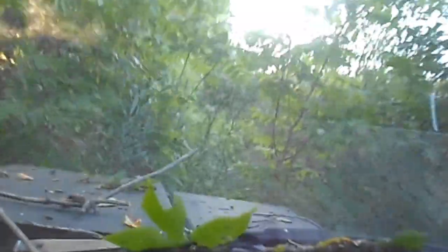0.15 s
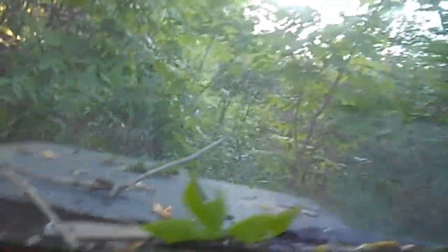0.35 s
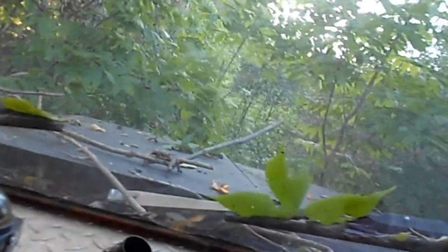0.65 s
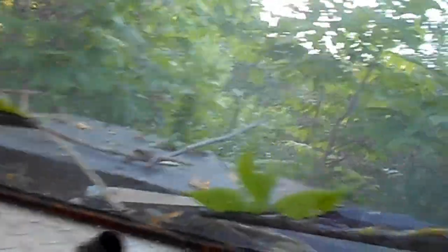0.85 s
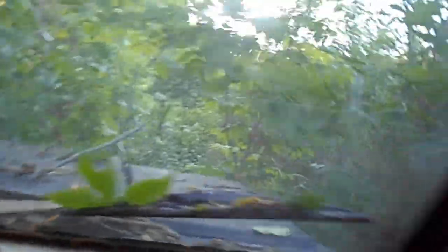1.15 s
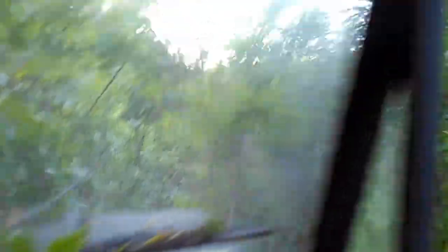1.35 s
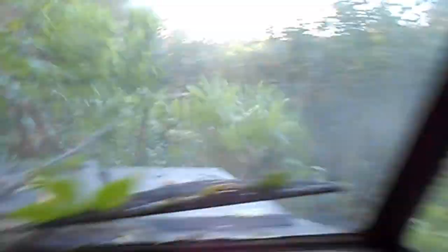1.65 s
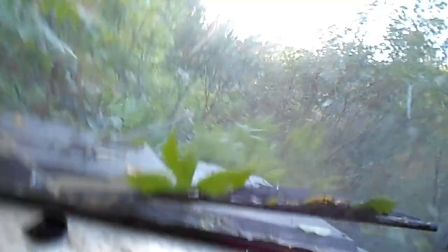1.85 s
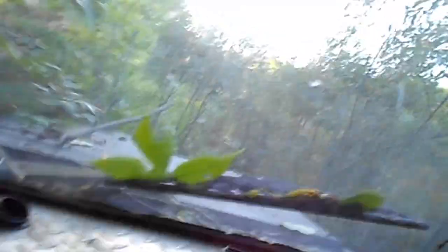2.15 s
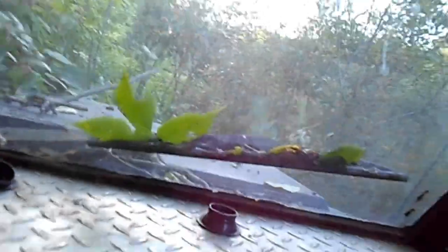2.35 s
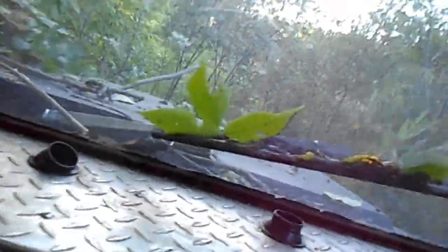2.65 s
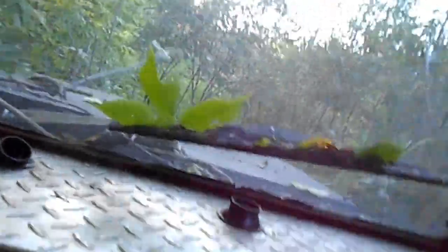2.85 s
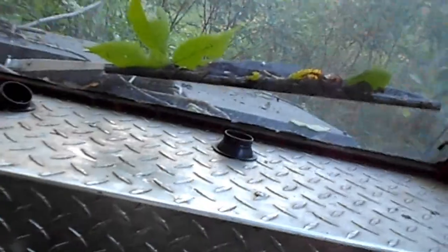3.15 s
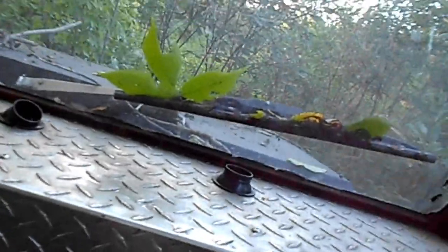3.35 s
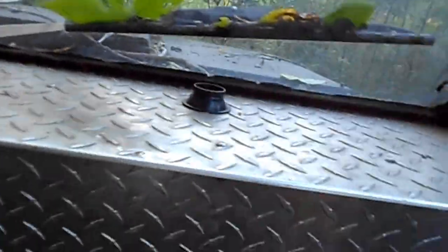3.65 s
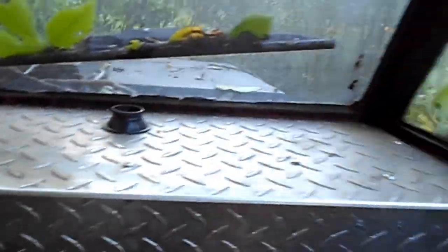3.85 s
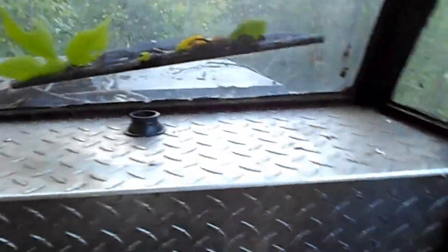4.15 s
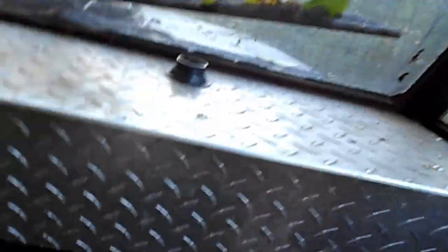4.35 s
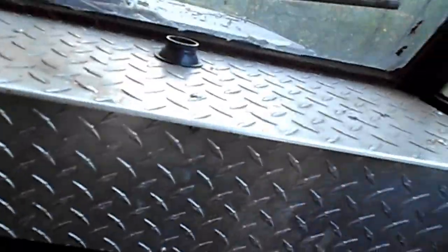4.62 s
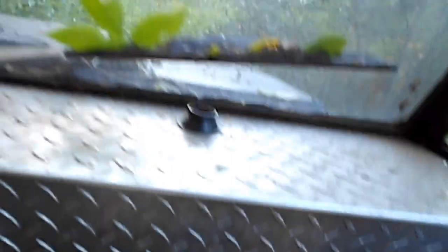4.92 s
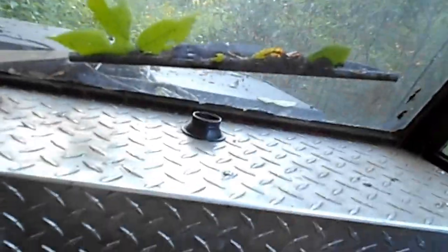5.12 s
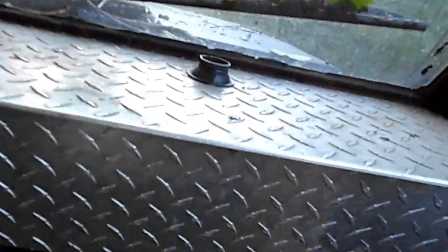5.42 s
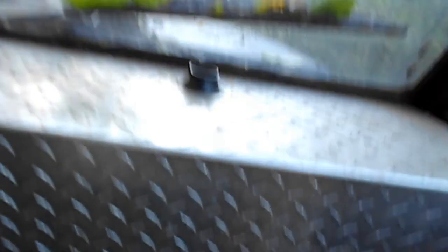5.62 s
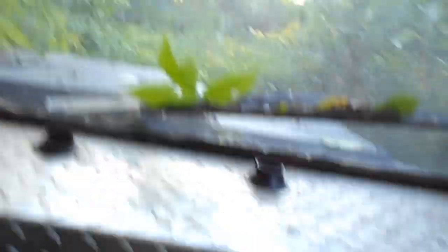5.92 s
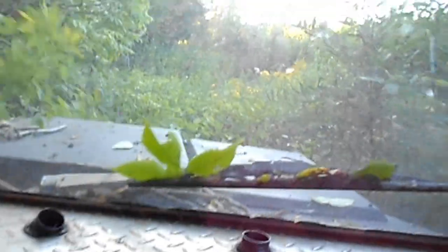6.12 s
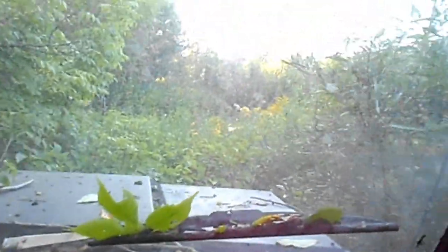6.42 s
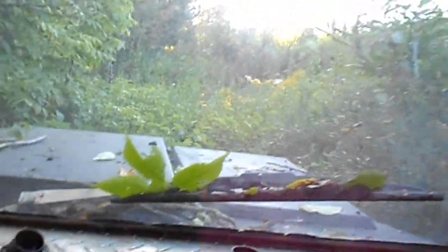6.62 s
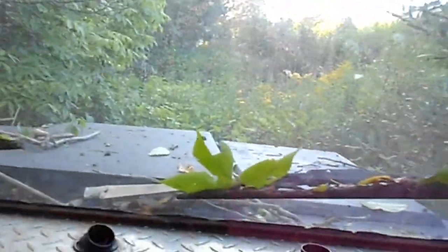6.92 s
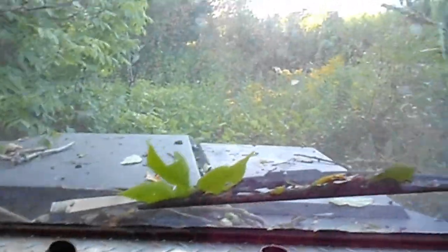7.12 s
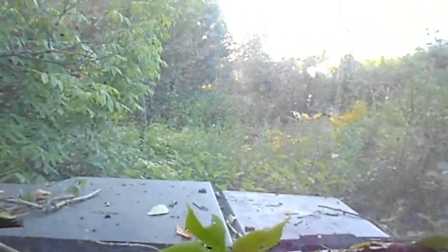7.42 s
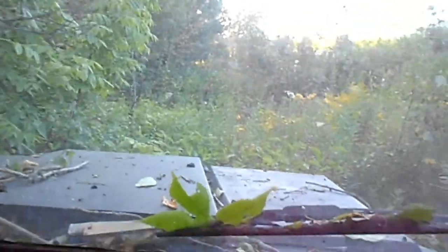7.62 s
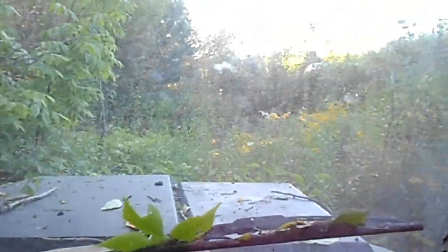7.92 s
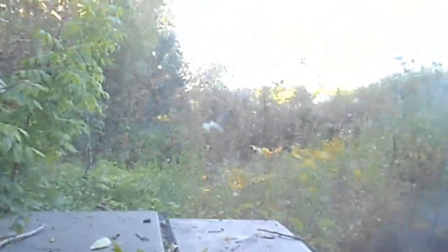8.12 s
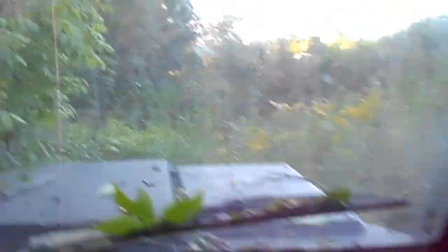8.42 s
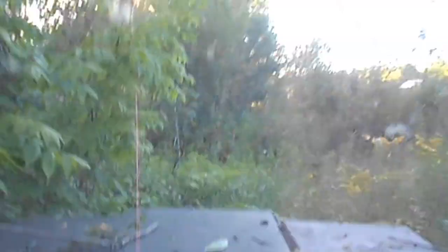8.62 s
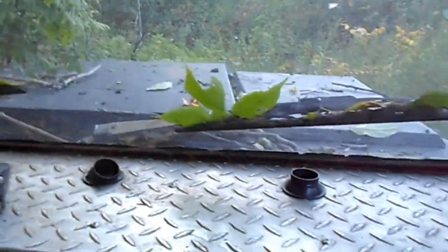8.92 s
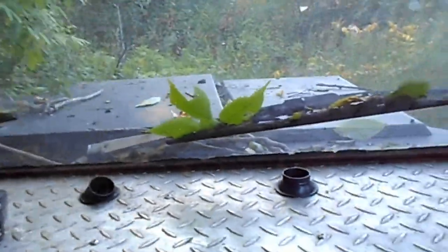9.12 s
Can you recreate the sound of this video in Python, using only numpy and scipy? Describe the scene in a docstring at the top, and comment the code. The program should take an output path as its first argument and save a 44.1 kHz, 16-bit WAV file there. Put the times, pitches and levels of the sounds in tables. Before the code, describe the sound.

A loud, bassy engine drone fills a metal cab from start to end, with faint brush hiss and ringing sheet metal. Grainy branch scrapes, hard little ticks and brief hoarse squeaks come irregularly. Deep thumps hit the floor after two seconds as the engine slows and the chassis shudders. Later it steadies, contact noises thin out, dry clicks fall, and the revs jump before one last faint bump. Recorded by a small microphone in the cab.

```python
"""A truck with a slow eight-cylinder engine pushes through brush on a rough trail, heard inside the steel cab.
From the start the firing rate booms in the cab, made of near sines that throb once per engine cycle, over a
roar of coloured noise from engine block and trail. Branches scrape (grainy noise), twigs tick (noise and
short rings), and panels squeak (wavering tones and noise). After two seconds a low shake (two tones) and
bumps (fading sines) thump the floor and the first dry clicks (bare impulses) fall; one more bump comes late."""
import sys
import numpy as np
from scipy import signal
from scipy.io import wavfile

SR = 44100
rng = np.random.default_rng(int(sys.argv[2]) if len(sys.argv) > 2 else 0)


def convert_level_to_amplitude(level_db):
    """Map a level in decibels to its linear amplitude factor."""
    exponent = np.asarray(level_db, float) / 20
    return 10 ** exponent


def generate_wav(sig):
    """Save sig (samples, or channels by samples) to the path in sys.argv[1] as 16-bit PCM at SR."""
    pcm = np.round(np.clip(np.atleast_2d(sig).T, -1, 1) * 32767).astype(np.int16)
    wavfile.write(sys.argv[1], SR, pcm)


N = 408807
TOP_HZ = 10700  # upper edge of the sound


def rms_one(x):
    """Scale to rms 1."""
    return x / np.sqrt(np.mean(x ** 2) + 1e-20)


def in_time(rows):
    """Turn table columns into curves over all samples; the first column is the time in seconds."""
    seconds, *columns = np.transpose(rows)
    return [np.interp(np.arange(N) / SR, seconds, column) for column in columns]


def at_hz(points, hz):
    """Read a table of (Hz, dB) between its points, on a log-frequency axis."""
    table_hz, table_db = np.array(points).T
    return np.interp(np.log(hz), np.log(table_hz), table_db)


def drift(rate, size=N):
    """Slow random curve through points of spread 1, turning about rate times a second (190 at most)."""
    knots = rng.standard_normal(int(N / SR * 400) + 4)
    return np.interp(np.arange(size) * 2 * min(rate, 190) / SR, np.arange(len(knots)), knots)


def band(x, low_hz, high_hz):
    """Keep the sound between two frequencies."""
    return signal.sosfilt(signal.butter(2, [low_hz, high_hz], "band", fs=SR, output="sos"), x)


def resonance(x, hz, width):
    """Ring at one frequency: a two-pole filter with gain near 1 at its top, wider meaning a shorter ring."""
    r = np.exp(-np.pi * width / SR)
    return signal.lfilter([1 - r, 0, r - 1], [1, -2 * r * np.cos(2 * np.pi * hz / SR), r * r], x)


def rung(x, modes):
    """Pass the sound through resonances side by side, with alternating sign."""
    out = 0
    for k, (hz, width, db) in enumerate(modes):
        out = out + (-1) ** k * convert_level_to_amplitude(db) * resonance(x, hz, width)
    return out


def coloured(spectrum, patchy_db, ref_low, ref_high):
    """Half-octave noise bands that flicker partly together; rms 1 between the two reference edges."""
    out = 0
    together = drift(9.0)
    edges = 15 * 2 ** np.arange(0, 9.8, .5)  # Hz
    white = rng.standard_normal((2, N))
    for k, (low, high) in enumerate(zip(edges, edges[1:])):
        flicker_db = patchy_db * (together + 2.06 * drift(18.0))
        level_db = at_hz(spectrum, np.sqrt(low * high)) + flicker_db
        out = out + convert_level_to_amplitude(level_db) * band(white[k % 2], low, high)
    return out / np.std(band(out, ref_low, ref_high))


# Engine speed. Each row: time in seconds, firings per second.
SPEED = [(0, 53), (.52, 51), (.8, 57), (1.11, 58.7), (1.5, 59.6), (1.8, 59), (2.1, 60.5), (2.25, 50.6),
         (2.5, 44.2), (3.17, 43.9), (3.5, 42.5), (4.33, 43.9), (4.7, 47.9), (7.1, 48.4), (7.37, 46.7),
         (7.46, 48.5), (7.66, 63.5), (7.87, 63.7), (8.1, 66), (8.55, 61.7), (8.85, 67), (9.11, 50),
         (9.27, 43.6)]
# How each cylinder's push departs from the mean, in firing order, before scaling to the speed.
# Each row: share by which it is stronger, share by which it is earlier.
CYLINDERS = [(0.58, 0.51), (0.8, 0.55), (0.48, 0.13), (-0.18, -0.35), (-0.64, -1.2), (-1.0, -1.23),
             (-0.41, 0.56), (0.38, 1.03)]
# What the cab makes of each speed; it resonates near 50 Hz. Each row: firing rate in Hz, boom level in dB,
# unevenness of the cylinders in dB relative to the boom, second harmonic in dB relative to the boom.
CAB_BOOM = [(43.2, -12.5, -16, -38), (45, -11.5, -25.5, -36), (47.8, -11, -26.5, -25),
            (52.6, -12, -29, -22.5), (55.7, -10.5, -22, -21.5), (59, -13.5, -15.5, -19.5),
            (60, -14, -7.5, -18.5), (66, -13, -10, -21.5)]
# The driver lifts off the throttle. Each row: start in seconds, length in seconds, change of the boom in dB.
LIFT_OFFS = [(2.126, 0.27, -9.5), (2.419, 0.084, -14.5), (2.561, .18, -11.5), (2.49, 0.12, -3.5),
             (2.884, 0.47, -3), (8.91, 0.13, -3), (8.92, 0.45, -5)]
# Lesser multiples of the engine cycle as the cab passes them. Each row: frequency in Hz, level in dB.
LESSER_ORDERS = [(15, -59), (30, -47.5), (60, -37), (80, -41.5), (90, -60), (110, -48), (150, -50),
                 (190, -63.5), (260, -61)]


def engine(waver_db=0.82, lesser_waver_db=2.5, uneven_waver_db=1.5):
    """Near sines on the firing rate, bent by the eight unequal cylinders, plus other multiples of the cycle."""
    pedal_s, second_unevenness = 0.09, 2.3  # the second harmonic feels the unequal cylinders more
    per_s, = in_time(SPEED)
    hz, *laws = np.transpose(CAB_BOOM)
    boom_db, uneven_db, second_db = (np.interp(per_s, hz, law) for law in laws)
    t = np.arange(N) / SR
    for s, length, change_db in LIFT_OFFS:
        inside = np.minimum(t - s, s + length - t)  # seconds to the nearer end
        boom_db = boom_db + change_db * np.clip(inside / pedal_s + .5, 0, 1)
    uneven_db = uneven_db + uneven_waver_db * drift(2.5)

    # eight firings make one cycle, drawn as 512 smooth points
    firings = np.cumsum(per_s) / SR
    stronger, earlier = np.transpose(CYLINDERS)
    smooth = signal.resample(stronger + 1j * earlier, 512)
    uneven = convert_level_to_amplitude(uneven_db) * np.interp(firings * 64, np.arange(512), smooth, period=512)

    # complex tones: the real part of uneven bends the level, the imaginary part the timing
    turn = np.exp(2j * np.pi * firings)
    boom = (1 + uneven) * turn * convert_level_to_amplitude(waver_db * drift(12.0))
    second = (1 + second_unevenness * uneven) * turn ** 2
    second = convert_level_to_amplitude(second_db) * second * convert_level_to_amplitude(2 * waver_db * drift(15.0))
    out = np.sqrt(2) * convert_level_to_amplitude(boom_db) * (boom + second).real
    for order in [3, 5, 10, 11, 12, 13, 14, *range(18, 32)]:  # multiples of the cycle
        level_db = at_hz(LESSER_ORDERS, per_s * order / 8)
        level_db = level_db + lesser_waver_db * drift(1.5) + rng.normal(0, 2.0)
        out += np.sqrt(2) * convert_level_to_amplitude(level_db) * np.sin(2 * np.pi * (firings * order / 8 + rng.random()))
    return out


# Levels of the roar. Each row: time in seconds, rumble at 170-400 Hz in dB, body at 400-1500 Hz in dB,
# brush hiss above 2500 Hz in dB.
ROAR = [(0.0, -34.5, -48, -61.5), (0.1, -41.5, -48, -61), (0.82, -48, -50, -64), (1.23, -43, -50, -63),
        (1.43, -36.5, -47, -58.5), (1.77, -43, -46, -59), (2.17, -36.5, -40, -54.5),
        (2.51, -45.5, -49, -64), (2.87, -42, -46.5, -59), (3.28, -48, -47, -60.5),
        (3.64, -45, -44.5, -53.5), (3.92, -40, -46, -57.5), (4.15, -34, -42.5, -53.5),
        (4.66, -43.5, -46.5, -57.5), (4.92, -46.5, -45, -62), (5.41, -43, -47.5, -59),
        (5.74, -48, -49.5, -61.5), (6.18, -46, -46.5, -58), (7.02, -47, -49, -63.5),
        (7.28, -44, -45.5, -63.5), (7.58, -44.5, -53.5, -65), (7.94, -46.5, -51, -67),
        (8.81, -39, -46.5, -62), (9.2, -46.5, -45.5, -60.5)]
# Spectra of rumble, body and hiss before levelling. Each row: frequency in Hz, level in dB per Hz.
RUMBLE_COLOUR = [(15, -1.5), (32, 1), (50, 21), (75, 10), (140, 7.5), (200, 3.5), (300, -6.5), (450, -20.5),
                 (900, -50)]
BODY_COLOUR = [(150, -16), (350, 3.5), (600, 0.5), (1000, -2.5), (1300, -1), (2400, -17.5), (4000, -37.5),
               (11000, -52.5)]
HISS_COLOUR = [(800, -8.5), (2000, -2), (4200, 2), (6000, -5.5), (9000, -7), (11000, -24.5)]
# Sheet-metal resonances in the roar. Each row: frequency in Hz, width in Hz, level in dB before cab_share.
CAB = [(554, 7.2, 0.5), (599.5, 9.8, 10), (796, 200, -6.5), (916, 6.3, -1.5), (980, 6, -12),
       (1130, 4.5, -2.5), (1247, 14, -3.5), (1390, 8.3, -8.5), (2140, 54, -10), (2650, 130, -5)]


def roar(gate=.22, cab_share=1.4, knock_db=1.5):
    """Rumble, ringing body and brush hiss pulse a little with every firing; in the body some knock harder."""
    rumble_db, body_db, hiss_db = in_time(ROAR)
    firings = np.cumsum(in_time(SPEED)[0]) / SR
    pulse = 1 + gate * np.cos(2 * np.pi * firings)
    knocks = rng.standard_normal(int(firings[-1]) + 2)
    body_db = body_db + knock_db * np.interp(firings, np.arange(len(knocks)), knocks)
    rumble = coloured(RUMBLE_COLOUR, patchy_db=1.0, ref_low=170, ref_high=400)
    body = coloured(BODY_COLOUR, patchy_db=1.3, ref_low=400, ref_high=1500)
    body = body + cab_share * rung(body, CAB)
    body = body / np.std(band(body, 400, 1500))
    hiss = coloured(HISS_COLOUR, patchy_db=1.2, ref_low=2500, ref_high=10000)
    return pulse * (convert_level_to_amplitude(rumble_db) * rumble + convert_level_to_amplitude(body_db) * body + convert_level_to_amplitude(hiss_db) * hiss)


# Panel resonances. Each row: frequency in Hz, width in Hz, level in dB before ring_share.
PANEL = [(575, 15, -7), (784, 42, -0.5), (1116, 14, -2), (1417, 41, 3), (1985, 22, -3.5), (2205, 29, 0),
         (3310, 26, -9.5), (4240, 340, 2.5), (4860, 39, -0.5), (5170, 120, 0), (6300, 23, -5.5)]


def contacts(events, shape, grain_db, ring_share=2.5, dull_hz=700):
    """Grainy noise under each contact's envelope, in three overlapping registers that ring the panels."""
    lows_db, highs_db = -2.5, -7.5  # outer registers of a contact of middling brightness, relative to its middle
    envelopes = np.zeros((3, N))
    for s, db, bright_db, length in events:
        at = round(s * SR)
        t = np.arange(min(int(8 * length * SR), N - at)) / SR
        lasts = length * np.array([[1.15], [1], [.8]])  # the highs die first
        levels_db = [[db + lows_db - bright_db], [db], [db + highs_db + bright_db]]
        envelopes[:, at:at + len(t)] += convert_level_to_amplitude(levels_db) * shape(t, lasts)
    grains = rng.standard_normal(N) * convert_level_to_amplitude(grain_db * drift(70.0))
    dull = signal.sosfilt(signal.butter(1, dull_hz, fs=SR, output="sos"), grains)
    out = 0
    for (low_hz, high_hz), envelope in zip([(230, 1200), (1100, 2800), (2900, 9200)], envelopes):
        struck = rms_one(band(dull, low_hz, high_hz)) * envelope + 1e-18
        ringing = struck + ring_share * rung(struck, PANEL)  # the panels ring on
        out = out + band(ringing, low_hz / 1.3, high_hz * 1.2)
    return out


# Branches drag along the panels. Each row: start in seconds, level in dB before the common trim,
# brightness in dB, length in seconds of the middle register.
SCRAPES = [(0, -35.5, -8, 0.033), (.424, -35, 1.5, 0.022), (.438, -43.5, -3, 0.044),
           (.9235, -43, 8.5, 0.048), (1.2, -39, -11, 0.065), (1.509, -45.5, 8.5, 0.043),
           (1.813, -38, 0.5, 0.054), (1.874, -42, -0.5, 0.05), (2.109, -37, 0, 0.059),
           (2.19, -44.5, -15, 0.044), (2.216, -34, -4.5, 0.021), (2.238, -29, -2, 0.027),
           (2.268, -35, -13.5, 0.049), (2.311, -29.5, -2, 0.017), (2.326, -38.5, -4, 0.078),
           (2.721, -36.5, -6, 0.044), (2.768, -36, -7.5, 0.088), (2.85, -43.5, 2.5, 0.085),
           (3.39, -40, -3, 0.059), (3.623, -48, -12.5, 0.06), (3.91, -36, -4, 0.21),
           (4.1594, -48, 12, 0.084), (4.2065, -26.5, -3, 0.019), (4.22, -26, -6.5, 0.039),
           (4.257, -40, -6, 0.025), (4.285, -46, -7, 0.026), (4.341, -26, 0.5, 0.036),
           (4.676, -37.5, -1.5, 0.069), (4.7354, -42, -6, 0.029), (4.9714, -37, -0.5, 0.059),
           (5.073, -34.5, -4, 0.059), (5.255, -32, -1, 0.11), (5.587, -40.5, -1.5, 0.061),
           (5.879, -44.5, 8, .03), (6.062, -34, 12, 0.028), (6.092, -33, 1, 0.029), (6.118, -38.5, 1, 0.12),
           (6.262, -53, 12, 0.027), (6.345, -52, 12, 0.012), (6.493, -38, -0.5, 0.04),
           (6.536, -43, 4, 0.039), (6.761, -39, -4.5, 0.074), (6.975, -49, 9.5, 0.025),
           (7.04, -47, 7, 0.068), (7.229, -36, 7, 0.048), (7.236, -35.5, 0, 0.11),
           (7.29, -40.5, 2.5, 0.052), (2.862, -46, 8.5, 0.023), (5.17, -47.5, 5.5, .03),
           (7.4, -47, 3.5, .04), (8.775, -38, -15.5, 0.053), (9.133, -45.5, 1, 0.1)]


def scrapes():
    """A dragging branch makes noise that rises fast, then fades as a bell curve with a thin tail."""
    def shape(t, length):
        fade = .85 * np.exp(-(t / length) ** 2) + .15 * np.exp(-t / (2 * length))
        return (1 - np.exp(-t / .003)) * fade
    return convert_level_to_amplitude(-9) * contacts(SCRAPES, shape, grain_db=3.0)


# Twigs and loose parts tick. Each row: start in seconds, level in dB (before the trim in ticks()),
# brightness in dB, decay in seconds of the middle register.
TICKS = [(.1396, -37.5, -3, .013), (.629, -48, 1.5, 0.011), (.927, -41, 4, .008), (.9662, -34, -3, 0.01),
         (.983, -33.5, 6, 0.012), (1.0774, -39.5, -7, 0.014), (1.092, -31, 3.5, 0.0086),
         (1.2146, -35, 13.5, 0.01), (1.931, -32.5, 3, 0.034), (2.301, -41, 11, 0.0055),
         (2.312, -36, 0, 0.008), (2.321, -33.5, 2, 0.0049), (2.697, -46, -15, 0.019),
         (4.3465, -24, 3, 0.014), (5.532, -40, -4.5, 0.021), (5.5698, -39.5, 3, 0.021),
         (6.01, -40, 0.5, 0.013), (6.068, -43, 8.5, .008), (6.783, -38, -4, 0.011), (7.232, -37, 5, .01),
         (7.472, -39.5, -8, 0.015), (4.209, -30, -1, .01), (5.256, -38, 8.5, .012),
         (8.4871, -41.5, -13.5, 0.0098), (8.8, -44, -11, .015)]


def small_ticks(per_s=1.4, middle_db=-50.5, decay_s=0.012):
    """Faint ticks at chance moments, as rows like those of TICKS."""
    rows = []
    for when, size, bright in rng.random((int(per_s * N / SR), 3)):
        rows.append((N / SR * when, middle_db + 8.0 * (size - .5), 7.3 * (bright - .5), decay_s))
    return rows


def ticks():
    """A tick is a burst of noise that fades at two speeds and lightly rings the panels."""
    def shape(t, decay):
        return .6 * np.exp(-t / decay) + .3 * np.exp(-t / .0015)
    return convert_level_to_amplitude(-7.0) * contacts(TICKS + small_ticks(), shape, grain_db=2.0, ring_share=.9)


# What a tick snaps with. Each row: frequency in Hz, level in dB relative to the tick,
# time to fade by 60 dB in seconds, share of the brightness added to the level.
SNAP = [(1200, -11, .02, -.5), (2200, -2, .035, 0), (5300, -8, .018, 1)]


def snaps():
    """Each listed tick starts with a hard snap: a few short fading sines, pitched differently every time."""
    out = np.zeros(N + SR)
    t = np.arange(SR // 20) / SR
    for s, db, bright_db, _ in TICKS:
        at = round(s * SR)
        for hz, mode_db, t60, share in SNAP:
            pitch_hz = hz * (1 + .04 * rng.standard_normal())
            level_db = db + mode_db + share * bright_db - 60 * t / t60
            out[at:at + len(t)] += convert_level_to_amplitude(level_db) * np.sin(2 * np.pi * pitch_hz * t)
    return out[:N]


# Stick-slip squeaks and hoarse groans of the panels. Each row: start in seconds, length in seconds,
# pitch in Hz, level in dB, roughness from 0 to 1, share of the length at which it is loudest.
SQUEAKS = [(.435, .04, 820, -41, 1, .3), (.44, .05, 1300, -44, 1, .4), (1.2, .07, 600, -39, 1, .4),
           (.925, .05, 2330, -48, .8, .5), (2.13, .13, 152, -32, .6, .5), (2.33, .22, 148, -36, .5, .15),
           (2.72, .13, 152, -29, .4, .6), (2.87, .1, 150, -36, .6, .5), (2.236, .014, 1230, -38, .9, .4),
           (2.262, .04, 1200, -37, .9, .4), (3.92, .05, 1120, -41, .9, .5), (3.972, .04, 1250, -35, 1, .4),
           (4.044, .05, 2080, -32, .3, .72), (4.095, .03, 2100, -43, .45, .2),
           (4.125, .045, 1750, -47, .8, .4), (4.348, .045, 1400, -36, 1, .2),
           (4.67, .06, 1380, -40, .75, .5), (4.985, .09, 1420, -41, .8, .15),
           (5.085, .05, 1050, -40, 1, .4), (5.28, .06, 1100, -39, 1, .4), (5.82, .04, 1960, -53, .8, .5),
           (5.868, .035, 1185, -42, .8, .6), (5.845, .16, 1190, -46.5, .65, .3),
           (6.008, .04, 1215, -46, .8, .2), (6.116, .07, 1330, -36.5, 1, .3), (6.14, .06, 1800, -43, 1, .5),
           (6.378, .035, 1100, -40, .7, .4)]
# Overtones of a squeak. Each row: multiple of the pitch, level in dB before roughness weakens it.
SQUEAK_OVERTONES = [(2.02, 0), (3.03, -12), (3.91, -11), (4.86, -9)]


def squeaks():
    """A slipping contact sings a wavering pitch with overtones; rough ones turn into noise around it."""
    out = np.zeros(N)
    for s, length, hz, db, rough, crest in SQUEAKS:
        at, size = round(s * SR), int(length * SR)
        swell = np.interp(np.arange(size) / size, [0, .1, crest, .9, 1], [0, .35, 1, .55, 0])
        phase = 2 * np.pi * np.cumsum(hz * (1 + .02 * drift(150.0, size=size))) / SR
        width = hz * (.03 + .3 * rough ** 4)
        hoarse = resonance(rng.standard_normal(size), hz, width)
        hoarse = rms_one(resonance(hoarse, hz, width))
        first = np.sqrt(2 * (1 - rough)) * np.sin(phase) + np.sqrt(rough) * hoarse
        over = np.zeros(size)
        for multiple, over_db in SQUEAK_OVERTONES:
            if multiple * hz < TOP_HZ:
                over += convert_level_to_amplitude(over_db + 3.0 * drift(150.0, size=size)) * np.sin(multiple * phase)
        over *= convert_level_to_amplitude(-33 * rough)  # clean squeaks carry the stronger overtones
        voice = swell * first + np.sqrt(swell) * np.hanning(size) * over
        out[at:at + size] += convert_level_to_amplitude(db + 2.2 * drift(90.0, size=size)) * voice
    return out


# A low shake of the chassis while the truck labours over an obstacle. Each row: time in seconds,
# frequency in Hz, level in dB, level of the upper hum in dB.
SHAKE = [(2.15, 27, -61, -50), (2.3, 27.86, -24, -36), (2.6, 28.6, -33.5, -32), (2.9, 29.14, -21, -32),
         (3.4, 29.22, -38, -35.5), (3.9, 29.1, -39, -38), (4.1, 28, -57, -50)]


def shake():
    """The chassis shakes as a low sine with a wavering hum above it."""
    hz, db, upper_db = in_time(SHAKE)
    phase = 2 * np.pi * np.cumsum(hz) / SR
    low = convert_level_to_amplitude(db) * np.sin(phase)
    upper = convert_level_to_amplitude(upper_db + 2.0 * drift(10.0)) * np.sin(2.52 * phase)
    return np.sqrt(2) * (low + upper)


# Bumps in the trail. Each row: start in seconds, level in dB before swell and fade, boom frequency in Hz,
# swell in seconds, time for the boom to fade by 60 dB in seconds.
BUMPS = [(2.263, -3, 48.8, .07, 0.072), (2.304, -14, 44.2, 0.0046, 0.13), (2.774, -10, 46.3, 0.068, 0.17),
         (8.77, -29, 49.89, .005, 0.19)]
# Ringing of the floor pan. Each row: frequency in Hz, level in dB relative to the boom,
# time to fade by 60 dB in seconds.
FLOOR_PAN = [(28, -15.5, 0.3), (83, 0.5, 0.067), (148, -17, 0.24), (209, -43, 0.16)]


def bumps():
    """Each bump swells a short boom of the cab and rings the floor pan."""
    out = np.zeros(N)
    t = np.arange(SR // 2) / SR
    soft = 1 - np.exp(-t / .011)  # springs spread the blow
    for s, bump_db, boom_hz, swell, t60 in BUMPS:
        fade = convert_level_to_amplitude(-60 * np.maximum(t - swell, 0) / t60)
        ring = np.sqrt(np.minimum(t / swell, 1)) * fade * np.sin(2 * np.pi * boom_hz * t)
        for hz, db, decay in FLOOR_PAN:
            ring += convert_level_to_amplitude(db - 60 * t / decay) * np.sin(2 * np.pi * hz * t)
        at = round(s * SR)
        out[at:at + len(t)] += (convert_level_to_amplitude(bump_db) * soft * ring)[:N - at]
    return out


# Thin dry clicks. Each row: time in seconds, impulse level in dB before filter and gain.
CLICKS = [(2.3225, -23), (2.334, -30), (6.955, -43.5), (7.42, -41), (7.4665, -32.5), (7.525, -35.5),
          (7.536, -43)]


def clicks():
    """Each click is a bare impulse, with its lowest and highest parts filtered away."""
    impulses = np.full(N, 1e-18)
    for s, db in CLICKS:
        impulses[round(s * SR)] = convert_level_to_amplitude(db)
    return 3 * band(impulses, 500, 7000)


def scene():
    """Everything reaches one microphone in the cab."""
    steady = engine() + roar()
    brush = scrapes() + ticks() + snaps() + squeaks()
    return (steady + brush + shake() + bumps() + clicks())[None]


def low_pass(x):
    """Removes everything above the highest recorded frequency."""
    return signal.sosfilt(signal.butter(12, 10810, fs=SR, output="sos"), x)


def record(dry):
    """The small microphone rounds the highest peaks, then the top is cut."""
    rounded = dry / (1 + (np.abs(dry) / .9) ** 6) ** (1 / 6)
    top_cut = signal.cheby2(10, 50, TOP_HZ + 900, fs=SR, output="sos")
    cut = signal.sosfilt(top_cut, rounded)
    return low_pass(cut)


dry = scene()
out = record(dry)
generate_wav(out)
```